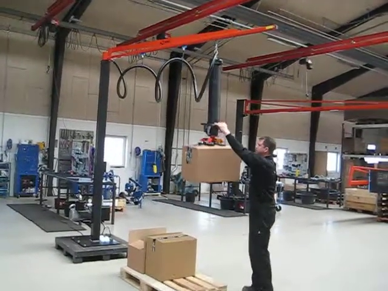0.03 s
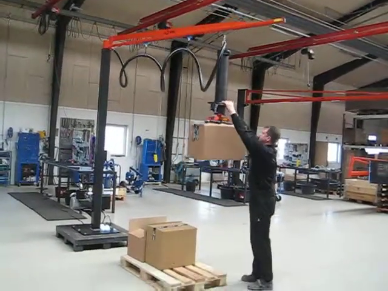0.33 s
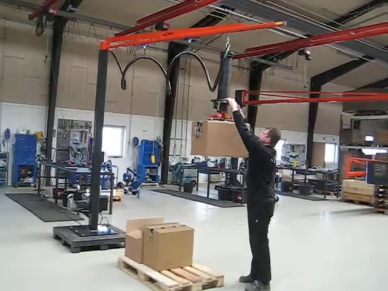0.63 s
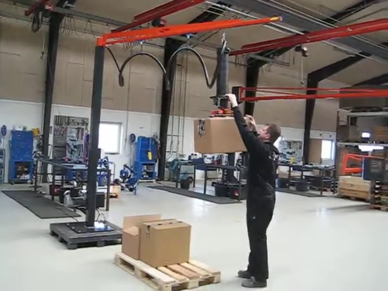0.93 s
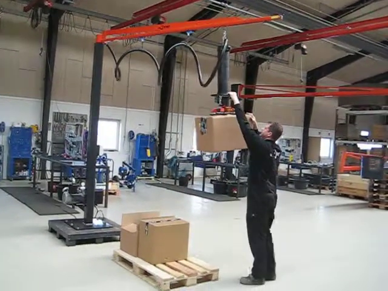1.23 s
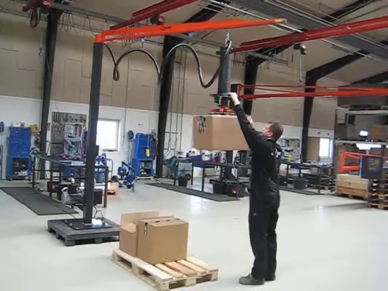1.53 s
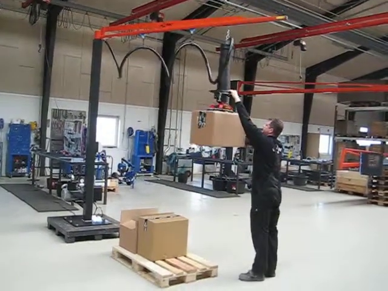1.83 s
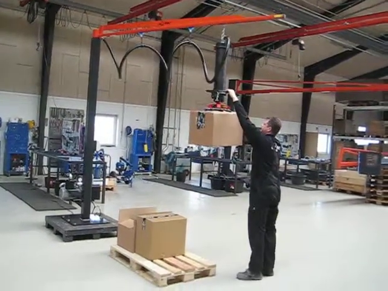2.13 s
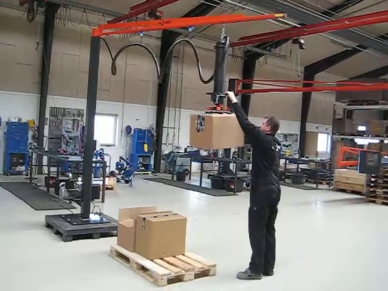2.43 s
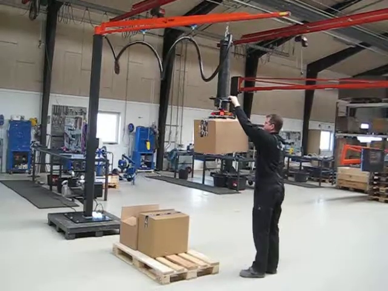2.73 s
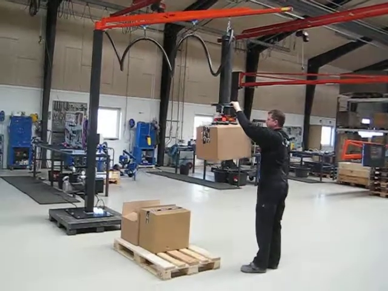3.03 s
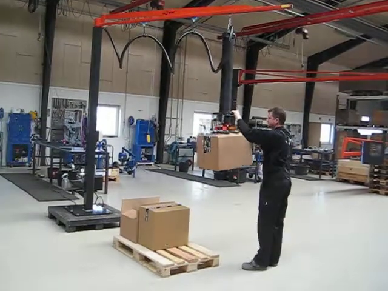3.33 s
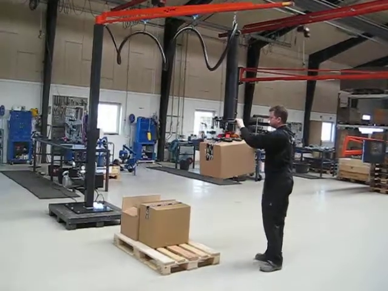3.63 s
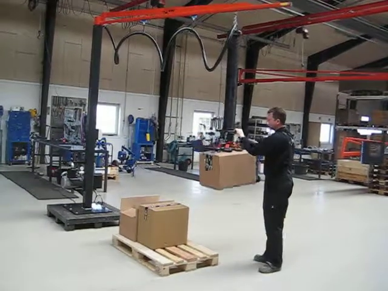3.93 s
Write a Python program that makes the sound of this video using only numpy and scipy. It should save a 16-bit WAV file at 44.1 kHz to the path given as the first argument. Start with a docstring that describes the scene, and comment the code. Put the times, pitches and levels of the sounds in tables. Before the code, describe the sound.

The buzzing pump and high whine of a vacuum lifter give way to hissing air.

```python
"""A pump buzzes and a blower whines in a workshop: a vacuum tube lifter is holding a box.
The pump's fast strokes make a hum, a metallic rasp and puffs of air; the whine rises as the vacuum builds.
After about two seconds a valve cracks open, then opens wide to lower the box: air rushes through
with a loud hiss, and the whine sags and sputters.
Echoes in the hall make the tones of the hum swell and the whine flutter."""
import sys
import numpy as np
from scipy import signal
from scipy.fft import rfft, irfft
from scipy.io import wavfile
from scipy.ndimage import uniform_filter1d

SR = 44100
rng = np.random.default_rng(int(sys.argv[2]) if len(sys.argv) > 2 else 0)


def digitize_waveform(pressure):
    """Quantize a signal to 16-bit integers and store it at the path in sys.argv[1].

    Rows of a 2-D input are taken as channels; values are limited to [-1, 1].
    """
    field = np.atleast_2d(pressure).T
    bounded = np.clip(field, -1, 1)
    quanta = np.round(bounded * 32767).astype(np.int16)
    wavfile.write(sys.argv[1], SR, quanta)


N = 176400
T = np.arange(N) / SR
JITTER_HZ = 89.5  # how quickly the speeds of pump and blower wobble

# How fast the pump runs: time_s, strokes_per_s
PUMP_SPEED = [(0, 72.53), (2.1, 72.33), (2.6, 72.68)]
STROKE_HZ = PUMP_SPEED[0][1]
# How the pump gets louder and softer: time_s, body_gain_db, rasp_gain_db, treble_gain_db
PUMP_GAINS = [(0, 0, 1.5, 0.5), (.16, 1, -2, -0.5), (.25, 1.5, -0.5, -1), (.34, 1, 1.5, -0.5),
              (.55, 0.5, 3.5, -4), (.72, 2, 2.5, -1), (.82, -5, -4.5, -11), (.92, -0.5, -0.5, -5.5),
              (1.06, 4, 2, -4), (1.16, -3.5, -7, -12.5), (1.36, -2, -2.5, -9), (1.47, -6.5, -5.5, -11),
              (1.68, -6.5, -7.5, -11), (1.8, -3.5, -5, -5.5), (1.89, -1.5, 2, -1.5), (2.08, -3.5, 0, -3.5),
              (2.19, -17.5, -14, -16), (2.4, -12, -6.5, -23), (2.63, -7.5, -6, -4), (3.3, -7, -7, -5),
              (3.62, -6.5, -5.5, -10), (3.72, -8.5, -6.5, -3), (4, -7.5, -5, -7)]


def pump_strokes():
    """Where the slightly unsteady pump is in its cycle, in radians: one turn for each stroke."""
    speed_hz = curves(PUMP_SPEED)[0] * (1 + 0.00026 * drift(JITTER_HZ))
    return 2 * np.pi * np.cumsum(speed_hz) / SR


def pump_hum(phase, weak_db=-53.5, weak_bass_cut_hz=375, waver_db=2.2):
    """The strokes make harmonics, tones at whole multiples of their rate; each wavers in the hall."""
    # The strong tones of the hum: harmonic_number, level_db
    strong_tones = [(5, -49), (9, -51), (10, -52.5), (12, -45.5), (13, -42), (14, -44.5), (15, -41),
                    (18, -44.5), (21, -47), (22, -47), (23, -44), (27, -49), (32, -45.5)]
    strong_db = dict(strong_tones)
    body_gain = amp(curves(PUMP_GAINS)[0])
    out = amp(np.interp(T, [1.9, 2.2], [-60, -64.5])) * np.sin(phase)  # the lowest tone
    for k in range(2, 37):
        weak = amp(weak_db) / (1 + (weak_bass_cut_hz / (k * STROKE_HZ)) ** 2)
        level = body_gain * (amp(strong_db[k]) if k in strong_db else weak)
        level = hall_swell(k, level) * amp(waver_db * drift(rate_hz=9))
        out += level * np.sin(k * phase + 2.64 * rng.standard_normal())
    return np.sqrt(2) * out


def pump_rasp(phase, treble_from_hz=3900, wander_db=3.5):
    """Metal rings, pulsing once a stroke: a row of high tones, some of which flare up and whistle."""
    # Strength of the rasp's tones: pitch_hz, level_db
    ring_colour = [(2300, -55), (2650, -48), (2960, -45), (3150, -40), (3500, -43), (3800, -51.5),
                   (4100, -39.5), (4400, -51), (5000, -52.5), (5200, -60.5), (7200, -60.5), (10000, -75)]
    # Short whistles: start_s, length_s, centre_hz, half_width_hz, level_db
    whistles = [(-.05, 0.27, 4390, 200, -37), (-.05, 0.49, 2957, 93.2, -32), (.27, 0.15, 4100, 220, -33.5),
                (0.548, 0.26, 4250, 200, -37), (0.941, .16, 4220, 260, -37),
                (0.974, 0.16, 4850, 380, -44.5), (1.22, 1, 3315, 90, -42), (3.18, .22, 3425, 260, -36.5),
                (3.47, .16, 4055, 80, -34)]
    _, rasp_gain, treble_gain = amp(curves(PUMP_GAINS))
    out = np.zeros(N)
    for multiple in 31.77 + np.arange(108):  # one stroke rate apart, each just below a harmonic
        hz = multiple * STROKE_HZ
        gain = rasp_gain if hz < treble_from_hz else treble_gain
        level = gain * colour(ring_colour, hz) * amp(wander_db * drift(rate_hz=3.8))
        for start, length, centre, half_width, db in whistles:
            if abs(hz - centre) < half_width:
                closeness = np.cos(np.pi / 2 * (hz - centre) / half_width) ** 2
                level = np.maximum(level, amp(db) * np.sqrt(arch(start, length)) * closeness)
        out += level * np.sin(multiple * phase + 2 * np.pi * rng.random())
    return np.sqrt(2) * out


def pump_air(phase, puff_depth=0.39):
    """Air swirls through the pump, puffing with each stroke and surging now and then."""
    # The low and the high part of the rushing air: pitch_hz, gain_db
    low_colour = [(20, -35), (50, -16), (130, -24), (190, -22.5), (300, -3.5), (650, -4.5), (950, 2),
                  (2600, -2.5), (3500, 2.5), (6000, -46)]
    high_colour = [(1500, -48), (3000, -1.5), (4400, -3.5), (5300, -13), (6600, -8), (8000, -16),
                   (9500, -12), (16000, -44)]
    # Surges of air: start_s, length_s, centre_hz, width_hz, level_db
    surges = [(.29, 0.14, 960, 250, -41), (.96, 0.2, 1020, 260, -33), (1.23, 0.18, 1010, 218.3, -38),
              (2.4, 0.64, 1130, 90, -43.5), (2.5, 1.2, 960, 260, -55)]
    body_gain, _, treble_gain = amp(curves(PUMP_GAINS))
    low = amp(-33) * body_gain * air_noise(low_colour, swirl_db=2)
    high = amp(-33.5) * treble_gain * air_noise(high_colour, swirl_db=2)
    puffs = unit(1 + puff_depth * np.cos(phase))
    return (low + high + gusts(surges)) * puffs


def blower_whine(pump_phase, dip_s=.011, dip_db=-8.5):
    """Spinning blades make a tone that flutters against its echo and sputters once air flows freely."""
    # The blade tone: time_s, pitch_hz
    blade_pitch = [(0, 3478), (.2, 3535), (.45, 3617), (.72, 3760), (.9, 3838), (1.15, 3912), (1.35, 3965),
                   (1.47, 4020), (1.68, 4080), (1.9, 4015), (2.09, 3955), (2.25, 3730), (2.45, 3630),
                   (2.7, 3570), (3.1, 3552), (3.5, 3572), (3.75, 3545), (4, 3507)]
    # Its loudness: time_s, level_db
    blade_level = [(0, -24.5), (.45, -21.5), (.7, -24), (.78, -16), (.9, -21), (1.02, -24.5), (1.11, -18.5),
                   (1.4, -21), (1.7, -24), (1.92, -19.5), (2.1, -25.5), (2.2, -40), (2.28, -31.5),
                   (2.33, -31), (2.38, -48), (2.96, -45), (3.04, -31), (3.13, -31), (3.19, -40),
                   (3.26, -30.5), (3.37, -30), (3.45, -32.5), (3.57, -30.5), (3.68, -26), (3.76, -44),
                   (3.83, -28), (4, -35)]
    # Tones at 2, 3 and 4 times its pitch: time_s, second_db, third_db, fourth_db
    overtone_levels = [(0, -27, -36.5, -45), (.3, -27.5, -33.5, -50), (.7, -29, -34, -46),
                       (.82, -30.5, -39, -54), (1.2, -26, -36.5, -53), (1.45, -24.5, -51, -62),
                       (1.7, -20.5, -51, -65), (1.83, -30.5, -42, -61), (2.03, -22.5, -46, -65),
                       (2.25, -42.5, -62, -70), (3.3, -41.5, -52, -70), (4, -41, -39, -70)]
    # How deeply the pump's strokes chop the blade tone: time_s, depth (0 to 1)
    chop_depth = [(3.05, 0), (3.29, 0.3), (3.42, 0)]
    # Moments when the whine dips briefly: time_s
    dip_times = [.11, .31, .45, 0.581, 0.722, 1.889]
    # Chirps of the sputtering whine: start_s, length_s, level_db
    sputters = [(2.408, 0.054, -36), (2.517, 0.056, -38), (2.607, .03, -34), (2.645, .026, -30),
                (2.805, 0.034, -31)]
    pitch_hz = curves(blade_pitch)[0] * (1 + 0.0008 * drift(JITTER_HZ))
    blade_phase = 2 * np.pi * np.cumsum(pitch_hz) / SR
    chop = 1 + curves(chop_depth)[0] * (np.cos(pump_phase) + 0.35 * np.cos(2 * pump_phase))
    out = np.zeros(N)
    for k, db in enumerate([*curves(blade_level), *curves(overtone_levels)], 1):
        tone = np.sin(k * blade_phase) * (chop if k == 1 else 1)
        echo_db = -5.5 if k == 1 else -4.5
        tone = tone + amp(echo_db) * hall_echo(tone)
        slow_level = np.sqrt(uniform_filter1d(tone ** 2, size=4500))
        out += amp(db) * tone / slow_level  # evens out slow swells, keeps the quick flutter
    dips = sum(np.exp(-((T - time) / dip_s) ** 2) for time in dip_times)
    chirps = sum(amp(db) * arch(start, length) for start, length, db in sputters)
    return out * amp(dip_db * dips) + np.sqrt(2) * chirps * np.sin(blade_phase)


def valve_hiss(flutter_db=0.88):
    """A jet of air hisses through the valve, with a higher sizzle while the gap is opening."""
    # Loudness of the jet: time_s, level_db
    jet_level = [(0, -51), (.2, -50), (.5, -57), (1.68, -60), (1.75, -46), (1.87, -37.5), (2.04, -39),
                 (2.13, -25), (2.3, -24.5), (2.6, -24), (3.5, -25), (4, -25)]
    # Its mix of low and high: pitch_hz, gain_db
    jet_colour = [(100, -26), (400, -26.5), (1000, -10), (2000, -5.5), (2800, -1.5), (5500, 1), (8000, 0),
                  (9500, 3), (13000, 0.5), (16000, -1.5)]
    # Sizzles at the gap: start_s, length_s, centre_hz, width_hz, level_db
    sizzles = [(2.055, 0.2, 11300, 4500, -27.5), (2.07, 0.41, 9340, 1500, -28.5)]
    level = amp(curves(jet_level)[0] + flutter_db * drift(rate_hz=33))
    return level * air_noise(jet_colour, swirl_db=1.37) + gusts(sizzles)


def hall_swell(harmonic, level, fade_s=.1):
    """Lifts one tone of the hum for as long as the hall's echoes strengthen it."""
    # Tones that swell: harmonic_number, start_s, end_s, level_db
    swells = [(13, 2.6, 3.68, -47.5), (14, .2, 1.1, -38), (14, 1.28, 1.58, -42), (15, -.2, 1.08, -37.5),
              (18, .95, 1.75, -43), (18, 1.62, 2.08, -39), (21, -.1, .8, -35), (23, -.2, .55, -38.5),
              (27, .25, .8, -42)]
    for number, start, end, db in swells:
        if number == harmonic:
            fade = np.clip(np.minimum(T - start, end - T) / fade_s + .5, 0, 1)
            level = np.maximum(level, amp(db) * fade)
    return level


def hall_echo(sound, decay_s=0.47):
    """The walls return a blur of echoes that fades by 60 dB in decay_s."""
    tail = rng.standard_normal(SR) * amp(-60 * T[:SR] / decay_s)
    return signal.fftconvolve(sound, tail / np.linalg.norm(tail))[:N]


def hall_background(mains_hz=50):
    """The soft noise of the hall, with a trace of electric hum."""
    # The hall's own noise: pitch_hz, gain_db
    room_colour = [(15, -20), (38, -16), (49, -4), (60, -8), (100, -21), (180, -2), (250, -2), (1000, -3),
                   (8000, -17)]
    room = amp(-56) * air_noise(room_colour, swirl_db=0.48)
    return room + amp(-79) * np.sin(2 * np.pi * mains_hz * T)


def air_noise(points, swirl_db):
    """Noise of moving air at level one; swirls make random patches of time and pitch louder or softer."""
    hz, _, spectrum = signal.stft(rng.standard_normal(N), SR, nperseg=2048)
    swirls = uniform_filter1d(rng.standard_normal(spectrum.shape), size=16, axis=0)
    swirls = unit(uniform_filter1d(swirls, size=4, axis=1))
    shaped = spectrum * colour(points, hz)[:, None] * amp(swirl_db * swirls)
    return unit(signal.istft(shaped, SR, nperseg=2048)[1][:N])


def gusts(rows):
    """Bursts of noise, each gathered around its own pitch."""
    hz, out = np.fft.rfftfreq(N, 1 / SR), np.zeros(N)
    for start, length, centre, width, db in rows:
        peak = 1 / (1 + ((hz - centre) / width) ** 2) ** 2
        band = unit(irfft(rfft(rng.standard_normal(N)) * peak, N))
        out += amp(db) * band * arch(start, length)
    return out


def drift(rate_hz, count=4096):
    """A smooth random wobble of about size one, up to roughly the given rate."""
    span_s = 2 * T[-1]
    hz = np.fft.rfftfreq(count, span_s / count)
    wobble = unit(irfft(rfft(rng.standard_normal(count)) * np.exp(-(hz / rate_hz) ** 2)))
    return np.interp(T, np.linspace(0, span_s, count), wobble)


def arch(start, length):
    """A smooth rise from zero to one and back."""
    return np.sin(np.pi * np.clip((T - start) / length, 0, 1))


def curves(rows):
    """Joins the points of a time table with straight lines, one curve for each value column."""
    times, *columns = np.transpose(rows)
    return np.array([np.interp(T, times, column) for column in columns])


def colour(points, hz):
    """Reads the gain at the given pitches from a table of pitch_hz, gain_db."""
    pitches, db = np.transpose(points)
    return amp(np.interp(np.log(hz + 1), np.log(pitches), db))


def amp(db):
    """Turns decibels into a number to multiply by."""
    return 10 ** (np.asarray(db) / 20)


def unit(x):
    """Scales a signal to an average level (rms) of one."""
    return x / np.sqrt(np.mean(abs(x) ** 2) + 1e-20)


def scene():
    """Pump, blower and valve over the quiet of the hall, the same in both ears."""
    phase = pump_strokes()
    pump = pump_hum(phase) + pump_rasp(phase) + pump_air(phase)
    mono = pump + blower_whine(phase) + valve_hiss() + hall_background()
    return np.array([mono, mono])


def record(dry):
    """Cuts away the very highest treble."""
    cutoff_hz = 15780
    low_pass = signal.firwin(511, cutoff_hz, window=("kaiser", 9), fs=SR)
    return signal.oaconvolve(dry, low_pass[None], "same")


dry = scene()
out = record(dry)
digitize_waveform(out)
```